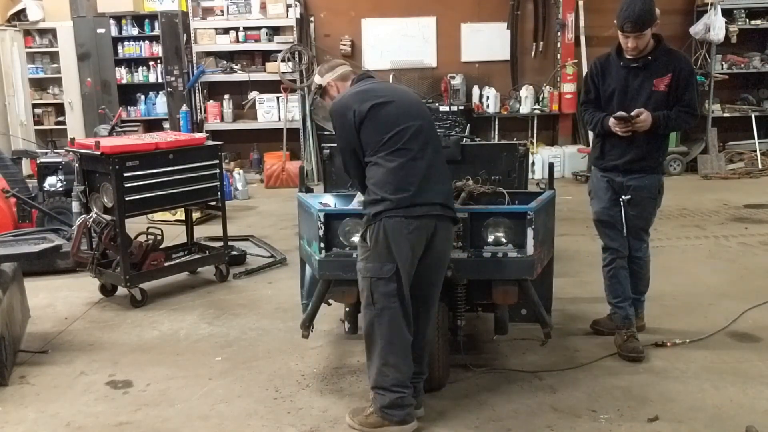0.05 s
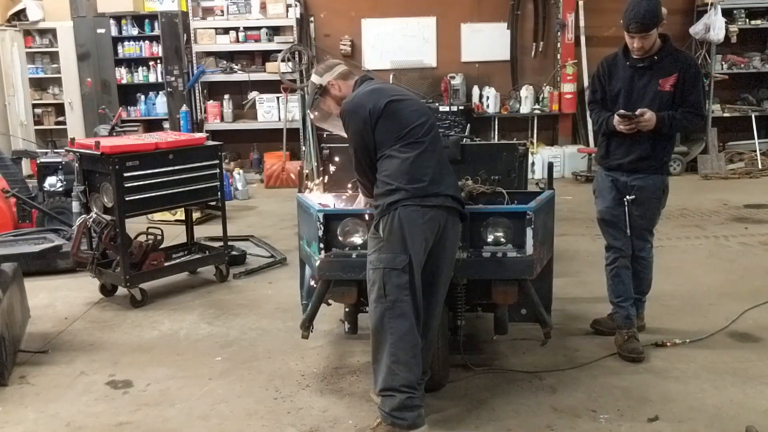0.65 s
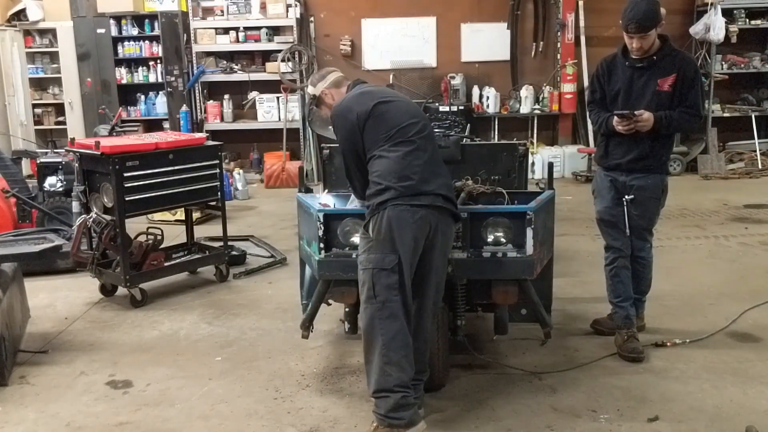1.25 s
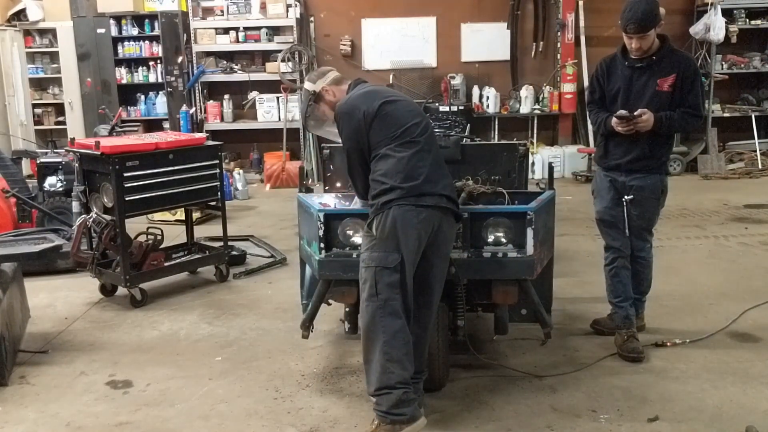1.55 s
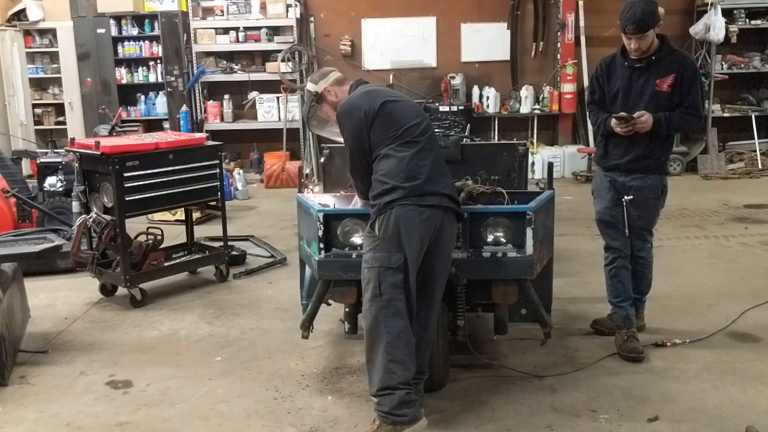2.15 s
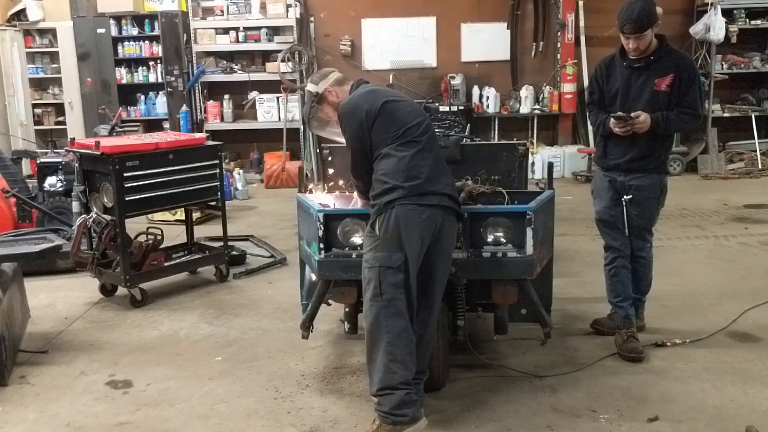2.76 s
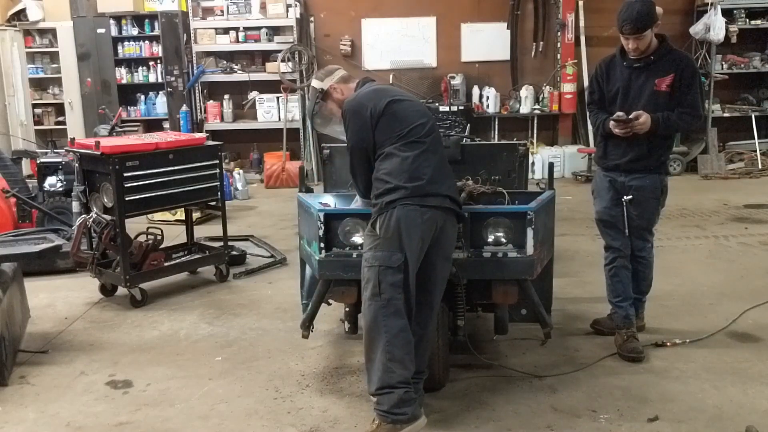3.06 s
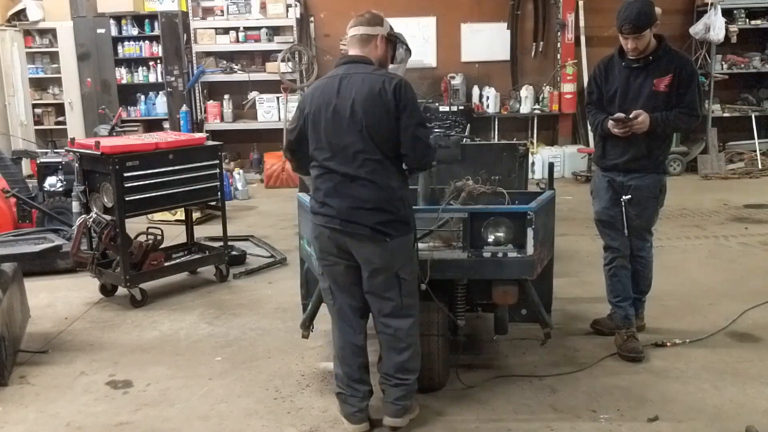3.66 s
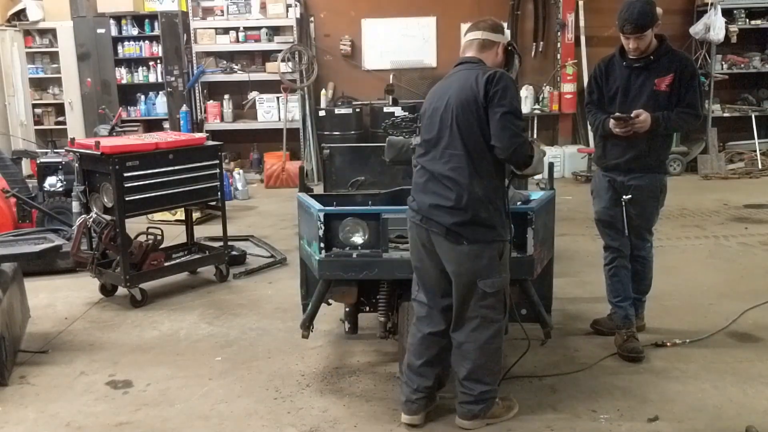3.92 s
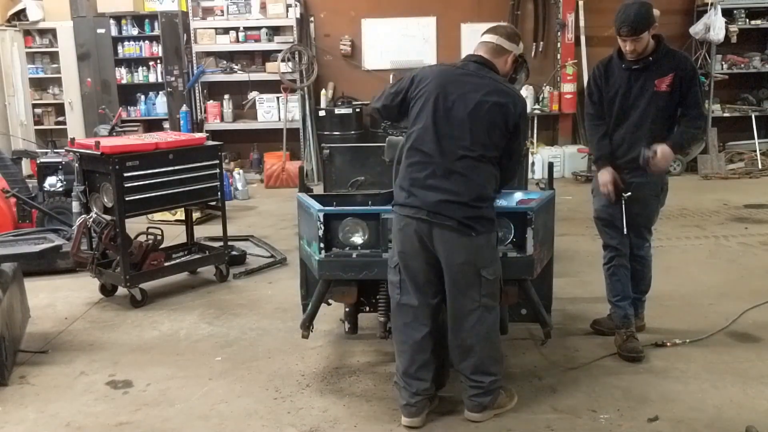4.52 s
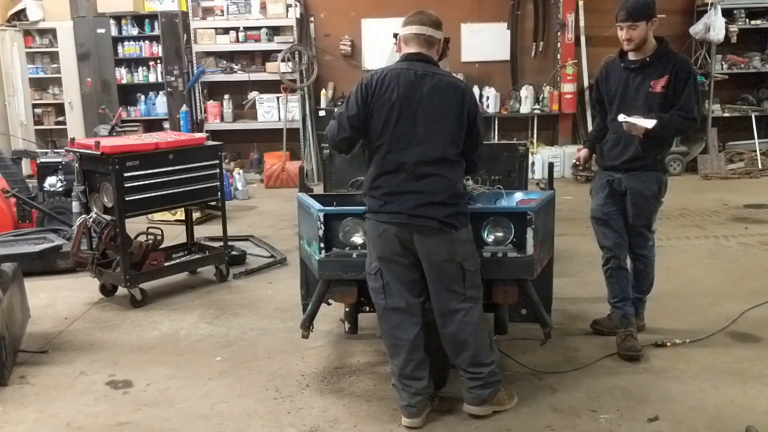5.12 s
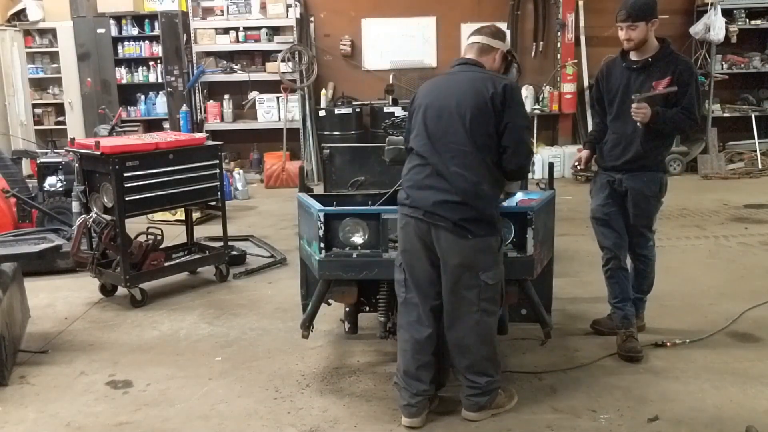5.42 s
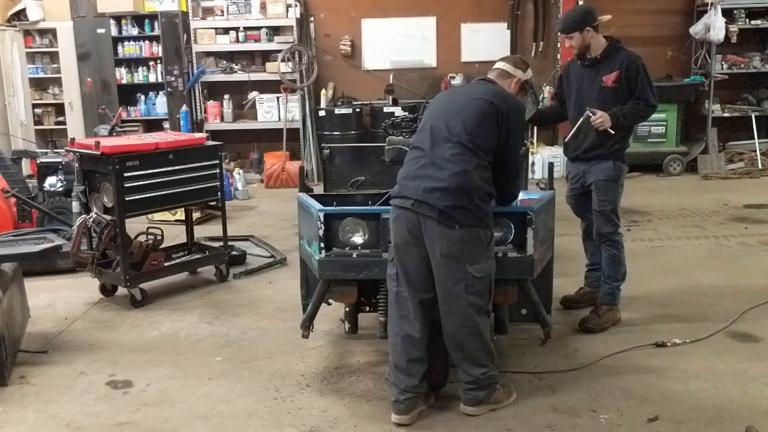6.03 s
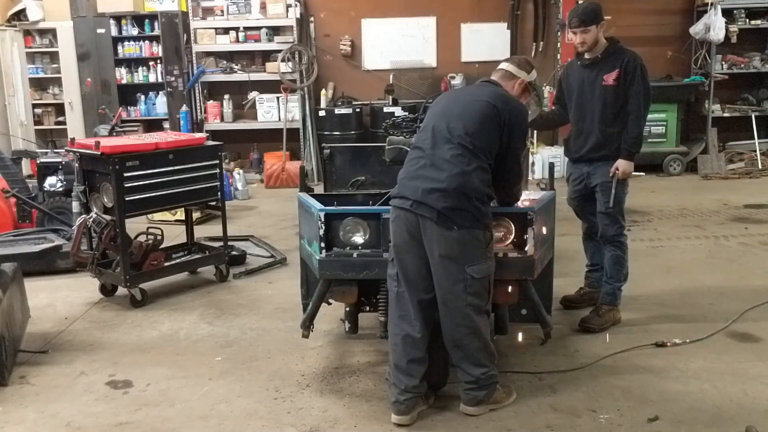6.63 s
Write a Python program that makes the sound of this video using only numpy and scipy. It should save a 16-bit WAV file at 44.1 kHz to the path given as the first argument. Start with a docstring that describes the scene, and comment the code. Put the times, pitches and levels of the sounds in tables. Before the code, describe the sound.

An air-powered cutting tool rasps and squeals through steel, winds down, then restarts after a few metal clanks.

```python
"""An air-driven cut-off tool grinds sheet steel a few metres away in a workshop. Its wheel rasps,
chatters once a turn and squeals in the slot as the cut brakes it, over the hiss of exhaust air.
It runs free and winds down with a falling whistle from the rotor vanes, is set against the metal
with a few clanks, then starts again with a blast of air and bites back in."""
import sys
import numpy as np
from scipy import signal
from scipy.fft import rfft, irfft
from scipy.io import wavfile
from scipy.ndimage import uniform_filter1d

SR = 44100
rng = np.random.default_rng(int(sys.argv[2]) if len(sys.argv) > 2 else 0)


def inscribe(sig):
    """Save sig as 16-bit PCM at rate SR to the path in sys.argv[1].

    A 1-D sig is mono; a 2-D sig holds one channel per row.
    Samples are clipped to [-1, 1] before scaling.
    """
    pcm = np.round(np.clip(np.atleast_2d(sig).T, -1, 1) * 32767)
    wavfile.write(sys.argv[1], SR, pcm.astype(np.int16))


N = 303408
T = np.arange(N) / SR
TOP_HZ = 15850
# the wheel leaves the cut, later coasts evenly to a stop, then starts again
FREE_S, STOP_S, COAST_S = 3.58, 5.035, .82
RESTART_S, SPIN_UP_S, RESTART_HZ = 5.911, .034, 448

# spectrum of the quiet shop: f/Hz, relative level/dB
ROOM_SPECTRUM = [(30, -9), (300, -25), (355, -2.5), (420, -26), (1100, -14.5), (15000, -20.5)]
# modes of the steel body: f/Hz, relative level/dB, t60/s
STEEL_MODES = [(627, -14, 0.074), (841, -11, 0.13), (1046, -8.5, .08), (1375, -4.5, 0.12),
               (1686, 1.5, 0.053), (1864, -3, 0.1), (2540, -9, 0.064), (3055, -0.5, 0.072),
               (3490, 3, 0.044), (3970, -3.5, 0.051), (4720, -3, 0.049), (6200, -8.5, 0.05),
               (8950, -1.5, .04)]
# tool and loose parts knock on the steel: t/s, level/dB, brightness/dB, share of the modes' t60
KNOCK_HITS = [(3.95, -30.5, -2, 0.56), (5.219, -41, 8, 0.87), (5.597, -67, 5, 0.97),
              (5.625, -34.5, -4, 0.98), (5.724, -23.5, -2, 0.6), (5.736, -32, -5.5, 0.79),
              (5.745, -37, -5.5, 0.51), (5.771, -36, 7, 0.81), (5.79, -45.5, 23, .5), (5.8, -49, 20, .7),
              (5.827, -50.5, 5, 0.76)]
# exhaust air in the first run: t/s, relative hiss level/dB, relative body level/dB
AIR_LEVELS = [(0, -37, -48), (.33, -34.5, -45), (.8, -39, -46.5), (1.5, -37.5, -47.5), (2.0, -38, -49.5),
              (2.6, -43.5, -45), (3.1, -37.5, -48.5), (3.55, -39, -49), (3.7, -36, -43.5), (3.95, -32, -46),
              (4.2, -38, -44)]
# spectrum of the air jet: f/Hz, relative level/dB
JET_SPECTRUM = [(2500, -35.5), (4500, -6.5), (5600, -6), (7000, -1.5), (10000, -2.5), (12000, -0.5),
                (14000, 0.5), (15500, 0.5)]
# spectrum of the air in the housing, the body of the hiss: f/Hz, relative level/dB
HOUSING_SPECTRUM = [(100, -39.5), (1000, -19.5), (1700, -4.5), (2650, -3), (3500, 4.5), (4450, -1),
                    (5100, 2.5), (5550, 4.5), (6200, -1), (10000, -30)]
# full blast of air, with the resonances of the exhaust port: f/Hz, relative level/dB
BLAST_SPECTRUM = [(200, -30.5), (1200, -13), (1950, -2), (2600, -5.5), (3400, -1), (4650, 3), (5500, -1.5),
                  (6800, 1), (8000, -4.5), (9050, 5), (10300, -4), (11600, 4.5), (13000, -2), (14300, 0.5)]
# spindle in the first run, braked by the cut: t/s, turn rate/Hz
SPINDLE_SPEED = [(0, 560.3), (.31, 620), (.5, 483), (.62, 555), (.74, 509), (1.0, 699.7), (1.42, 660),
                 (1.9, 480), (2.06, 533), (2.12, 507), (2.36, 474.2), (2.52, 470.3), (2.76, 429),
                 (2.95, 461.1), (3.17, 620.2), (3.31, 491.6), (3.58, 605.3), (4.2, 612)]
# whistle of the rotor vanes: multiple of the turn rate, relative level/dB
VANE_PARTIALS = [(2, -28), (3, -22.5), (4, -1.5), (5, -19), (8, -14), (12, -11.5)]
# spectrum of the cut: f/Hz, relative level/dB
RASP_SPECTRUM = [(20, -5.5), (70, -4.5), (150, -3.5), (300, -2.5), (520, -0.3), (900, -2), (1300, -5),
                 (2000, -8), (4000, -11), (12000, -31)]
# the wheel bites into the steel: t/s, length/s, relative level/dB, attack/s, release/s
WHEEL_BITES = [(0.218, 0.027, -56, 0.0082, 0.025), (0.292, 0.24, -37.5, 0.015, 0.09),
               (0.832, .035, -46.5, 0.011, 0.0097), (.9, 0.19, -61, 0.035, 0.018),
               (1.165, 0.013, -48, 0.0071, 0.0041), (1.293, 0.043, -39.5, 0.015, 0.038),
               (1.406, .21, -39, 0.0056, 0.0066), (1.722, .16, -37, 0.014, 0.094),
               (1.957, 0.063, -41.5, 0.014, .016), (2.085, 0.043, -44.5, .012, 0.033),
               (2.203, 0.032, -41, 0.012, 0.04), (2.269, 0.74, -55, .03, 0.024),
               (3.164, .13, -43.5, 0.022, 0.0071), (3.318, 0.033, -42, .005, .004),
               (3.716, 0.37, -55, .25, .025), (5.926, 0.51, -41, 0.11, .03), (6.28, 0.22, -36, 0.02, 0.12)]
# spectrum of the rim's overtones: f/Hz, relative level/dB
RIM_SPECTRUM = [(400, -15.5), (1100, -4), (1650, 2), (2300, -6.5), (3600, 3.5), (5200, 1.5), (7600, 2.5),
                (15000, -4.5)]
# the wheel rubs the side of the slot: t/s, length/s, level/dB
SLOT_RUBS = [(.4, 0.34, -43.5), (0.83, 0.28, -46), (1.86, 0.73, -42.5), (2.6, 0.35, -45.5),
             (3.169, 0.11, -51), (6.69, 0.22, -44)]
# loudest squeals and pings of wheel on steel: centre t/s, f/Hz, swell time/s, width/Hz, level/dB
WHEEL_SQUEALS = [(0.169, 6550, 0.047, 792, -37), (0.485, 7790, 0.041, 39.6, -28),
                 (0.522, 14400, 0.072, 158, -24.5), (0.514, 15200, .05, 396, -26),
                 (0.607, 2035, 0.062, 60, -39.5), (0.701, 2100, .04, 40, -41),
                 (0.664, 10350, 0.021, 40, -31), (0.86, 13200, .029, 160, -34),
                 (0.926, 6950, 0.037, 160, -37), (1.071, 14000, .039, 160, -31),
                 (.933, 5630, .029, 40, -40), (1.074, 8680, .028, 40, -34.5),
                 (1.177, 11020, 0.016, 160, -27.5), (1.462, 11550, .025, 40.2, -31.5),
                 (1.709, 5430, 0.025, 160, -37), (1.754, 7240, 0.018, 40, -33),
                 (2.043, 8600, 0.032, 40, -28.5), (2.04, 1590, 0.046, 40, -38.5),
                 (2.161, 1532, 0.057, 39.3, -41.5), (2.199, 6160, 0.017, 40, -34),
                 (2.406, 4050, .022, 159, -39), (2.485, 3240, .1, 40.4, -44), (2.568, 3980, 0.026, 40, -33),
                 (2.818, 2596, 0.033, 40, -43), (2.966, 3220, 0.035, 300, -43.5),
                 (2.978, 14730, 0.026, 1430, -33), (3.082, 6900, 0.048, 310, -40),
                 (3.094, 10720, 0.03, 432, -33.5), (3.225, 9060, .035, 233, -25),
                 (3.234, 1900, .03, 40, -39.5), (3.268, 7310, 0.021, 162, -26),
                 (3.289, 9350, 0.015, 40, -29.5), (3.42, 9900, .055, 896, -38),
                 (3.612, 4810, .052, 399, -33.5), (3.676, 5570, 0.075, 368, -32.5),
                 (3.73, 3820, 0.12, 640.5, -34), (3.834, 5540, 0.038, 240, -33),
                 (3.868, 10700, 0.1, 794, -31.5), (3.909, 7230, 0.025, 161, -35),
                 (3.954, 1370, .01, 150, -28.5), (4.265, 13300, 0.064, 839, -38),
                 (4.667, 3150, 0.018, 601, -43), (6.822, 5325, 0.036, 204, -38),
                 (6.827, 6240, 0.056, 40.1, -41), (6.824, 8430, 0.044, 40, -37)]


def undb(db):
    """Decibels to gain."""
    return 10 ** (np.asarray(db) / 20)


def curve(rows, column=1):
    """A column of a table, joined by straight lines in time."""
    rows = np.array(rows)
    return np.interp(T, rows[:, 0], rows[:, column])


def spectrum(points, hz):
    """Gain of a spectrum at the given frequencies."""
    f, db = np.transpose(points)
    return undb(np.interp(np.log(hz + 1), np.log(f), db))


def colour(x, points):
    """EQ a sound to a spectrum; rms 1."""
    y = irfft(rfft(x) * spectrum(points, np.arange(N // 2 + 1) * SR / N), N)
    return y / y.std()


def walk(rate, size=N):
    """Smooth random drift with about `rate` steps a second; spread near 1."""
    hold = max(int(SR / rate), 1)
    steps = np.repeat(rng.standard_normal(size // hold + 2), hold)
    return 1.22 * uniform_filter1d(steps, hold)[hold // 2:hold // 2 + size]


def flicker(depth_db, rate):
    """A gain that wavers at random within plus and minus depth_db."""
    return undb(depth_db * np.tanh(walk(rate)))


def envelope(start, length, db, attack, release):
    """A gain that rises, holds until its length is over, and dies away."""
    rise = np.clip((T - start) / attack, 0, 1)
    return undb(db) * rise * np.exp(-np.maximum(T - start - length, 0) / release)


def coasting():
    """Share of its speed that the wheel keeps: friction brakes it evenly to a stop."""
    return np.clip((STOP_S - T) / COAST_S, 0, 1)


def restarting():
    """Share of full drive after the throttle is opened again."""
    return 1 - np.exp(-np.maximum(T - RESTART_S, 0) / SPIN_UP_S)


def room_tone(level_db=-84.5):
    """The quiet shop: a faint, steady bed of noise."""
    return undb(level_db) * colour(rng.standard_normal(N), ROOM_SPECTRUM)


def knocks(crack_db=1, crack_s=.005, tail_db=-11, tail_s=.011, pivot_hz=3000, rattle=.85, detune=.04):
    """Knocks crack and ring the damped steel; hard, light contacts bring out the high modes."""
    out, t = np.zeros(N), T[:SR // 4]
    hz, mode_db, t60 = np.array(STEEL_MODES).T[:, :, None]
    low_cut = signal.butter(2, 700, "high", fs=SR, output="sos")  # small parts radiate no bass
    snap = undb(crack_db) * np.exp(-t / crack_s) + undb(tail_db) * np.exp(-t / tail_s)
    for s, db, bright_db, ring in KNOCK_HITS:
        tilt_db = 2 * bright_db * np.log10(hz / pivot_hz)
        gain = undb(mode_db + tilt_db + 2 * rng.standard_normal(hz.shape))
        blur = rattle * np.array([walk(350, len(t)) for _ in hz])  # loose parts smear the ring
        struck_hz = hz * (1 + detune * rng.standard_normal(hz.shape))  # each contact loads the panel
        phase = 2 * np.pi * (struck_hz * t + rng.random(hz.shape)) + blur
        decay = undb(-60 * t / (t60 * ring))
        modes = (gain * decay * np.sin(phase)).sum(0)
        crack = rng.standard_normal(len(t)) * undb(bright_db) * snap
        hit = signal.sosfilt(low_cut, modes + crack)
        start = int(s * SR)
        out[start:start + len(t)] += undb(db) * hit / hit[:SR // 200].std()  # level of the first 5 ms
    return out


def turbulence(x, depth_db=4.5, rate=30, count=18):
    """Each band of the jet swells and sinks on its own; rms 1."""
    band, whole = np.linspace(0, 1.35 * count, N // 2 + 1), rfft(x)
    bands = (irfft(whole * np.maximum(1 - abs(band - k), 0), N) for k in range(count + 1))
    y = sum(part * flicker(depth_db, rate) for part in bands)
    return y / y.std()


def exhaust(hiss_db=1.3, body_db=.3, surge_db=1.53, release_s=4.49, fade_db_per_s=35,
            blast_db=-17.5, blast_end_s=6.275, choke_s=.013, cutting_db=-28.5, ease_s=6.465):
    """Air jets from the motor and fades with it, treble first; the restart blasts through the port."""
    hiss = colour(rng.standard_normal(N), JET_SPECTRUM)
    body = colour(rng.standard_normal(N), HOUSING_SPECTRUM)
    blast = colour(rng.standard_normal(N), BLAST_SPECTRUM)
    flow = np.sin(np.pi / 2 * coasting()) ** 1.38
    swirl = turbulence(hiss) * undb(hiss_db + surge_db * walk(45))
    dulling_db = fade_db_per_s * np.maximum(T - release_s, 0)
    top = swirl * undb(curve(AIR_LEVELS) - dulling_db)
    mids = body * undb(body_db + curve(AIR_LEVELS, column=2))
    # as the wheel bites, the blast crossfades to a hiss that then eases off
    easing_db = fade_db_per_s * np.maximum(T - ease_s, 0)
    cutting = (hiss + undb(-8.5) * body) * undb(cutting_db - easing_db)
    bitten = .5 + .5 * np.tanh((T - blast_end_s) / choke_s)
    second_run = np.sqrt(bitten) * cutting + np.sqrt(1 - bitten) * undb(blast_db) * blast
    return flow * (top + mids) + restarting() * second_run


def vane_whistle(speed, turns, rough=.61, slow_hz=230, upper_db=19, low_cut_hz=750,
                 port_db=-46, port_hz=1190, port_width_hz=170):
    """Four vanes chop the air; the falling tone flares at the port's resonance, then overtones lead."""
    slow = 1 / (1 + (speed / slow_hz) ** 10)
    free = envelope(FREE_S, length=0, db=-45, attack=.026, release=.46) * coasting()
    flare = undb(port_db) * np.exp(-((4 * speed - port_hz) / port_width_hz) ** 2) * (T < STOP_S)
    tone = 0
    for k, db in VANE_PARTIALS:
        radiated = 1 / (1 + (low_cut_hz / (k * speed + 1)) ** 4)
        gain = free * radiated * undb(db + upper_db * slow * (k >= 8)) + flare * (k == 4)
        tone += gain * flicker(depth_db=6, rate=70) * np.cos(2 * np.pi * k * turns + rough * walk(250))
    return np.sqrt(2) * tone


def wheel_rasp(turns, grit_db=4, throb=.35, trim_db=1, graze_db=-74.5):
    """Abrasive grains tear at the steel, hardest once a turn, and shake the panel."""
    grains = rng.standard_normal(N) * undb(grit_db * walk(2500))
    pulse = 1 + throb * np.cos(2 * np.pi * turns)
    bite = np.max([envelope(*row) for row in WHEEL_BITES], axis=0)
    graze = undb(graze_db) * coasting()  # the spinning wheel between bites
    rasp = colour(grains * pulse, RASP_SPECTRUM) * flicker(depth_db=2, rate=90)
    return undb(trim_db) * rasp * (bite + graze)


def rim_chatter(speed, turns, shift_db=5, rough=.36, attack_s=.045, release_s=.06):
    """The uneven rim strikes once a turn; the contact keeps shifting, so each overtone comes and goes."""
    buzz, coarse = 0, slice(None, None, 64)
    for k in range(2, 34):
        hz = k * speed[coarse]
        gain = spectrum(RIM_SPECTRUM, hz) * (hz < TOP_HZ) * flicker(shift_db, rate=16)[coarse]
        tone = np.cos(2 * np.pi * (k * turns + rng.random()) + rough * walk(200))
        buzz += np.interp(T, T[coarse], gain) * (1 + walk(55)) * tone
    rub = np.max([envelope(*row, attack_s, release_s) for row in SLOT_RUBS], axis=0)
    return buzz / buzz.std() * rub


def rim_chirps(count=100, span_s=4.1, offset_db=-3.5, spread_db=4, swell_s=.028, hoarse_from_s=3.0):
    """Lesser catches of the rim at random, first clear, later hoarse; rows as in WHEEL_SQUEALS."""
    when, pitch, strength = rng.random((count, 3)).T
    times = .05 + span_s * (np.arange(count) + when) / count
    hz = 5700 + 9000 * pitch ** 1.5
    width_hz = np.where(times < hoarse_from_s, 110, 520)
    db = np.interp(times, T, curve(AIR_LEVELS)) + offset_db + spread_db * (2 * strength - 1)
    return list(zip(times, hz, [swell_s] * count, width_hz, db))


def wheel_squeals(speed, turns, throb=.59, scrape=.38, scrape_width=.12, pure_hz=130):
    """Stick-slip squeals glide with the spindle and throb at its rate; wide ones are rough screeches."""
    out = np.zeros(N)
    for s, hz, swell_s, width_hz, db in list(WHEEL_SQUEALS) + rim_chirps():
        near = np.arange(*np.searchsorted(T, [s - 2 * swell_s, s + 2 * swell_s]))
        phase = 2 * np.pi * np.cumsum(hz * speed[near] / speed[int(s * SR)]) / SR
        noise = lambda rate: (walk(rate, len(near)) + 1j * walk(rate, len(near))) / np.sqrt(2)
        purity = np.exp(-width_hz / pure_hz)
        core = np.sqrt(purity) + np.sqrt(1 - purity) * noise(width_hz + pure_hz)
        texture = core + scrape * noise(scrape_width * hz)
        depth = throb * min(1, (hz / 3000) ** 2)  # low rings of the panel hardly throb
        pulse = 1 + depth * np.cos(2 * np.pi * turns[near])
        swell = np.exp(-2 * ((T[near] - s) / swell_s) ** 2)
        out[near] += np.sqrt(2) * undb(db) * swell * pulse * np.real(texture * np.exp(1j * phase))
    return out


def scene():
    """One spindle drives all the tool's tones; the whole mix sits dead centre."""
    speed = curve(SPINDLE_SPEED) * coasting() + RESTART_HZ * restarting()
    speed *= 1 + .00398 * walk(60)  # slight pitch jitter
    turns = np.cumsum(speed) / SR
    air = exhaust()
    wheel = wheel_rasp(turns) + rim_chatter(speed, turns) + wheel_squeals(speed, turns)
    tool = air + wheel + vane_whistle(speed, turns)
    return np.tile(tool + room_tone() + knocks(), (2, 1))


def record(dry):
    """A steep high cut takes off the very top."""
    return signal.sosfilt(signal.ellip(12, .1, 80, TOP_HZ, fs=SR, output="sos"), dry)


dry = scene()
out = record(dry)
inscribe(out)
```